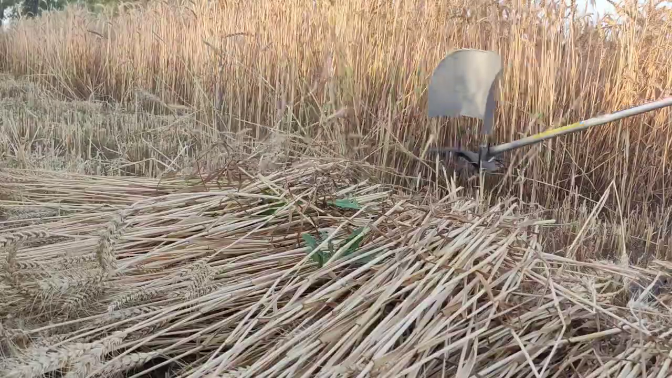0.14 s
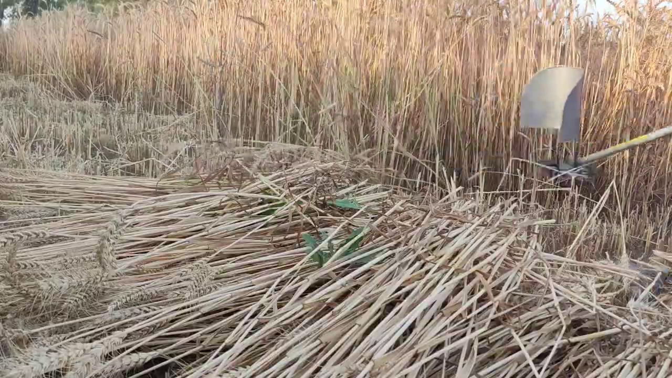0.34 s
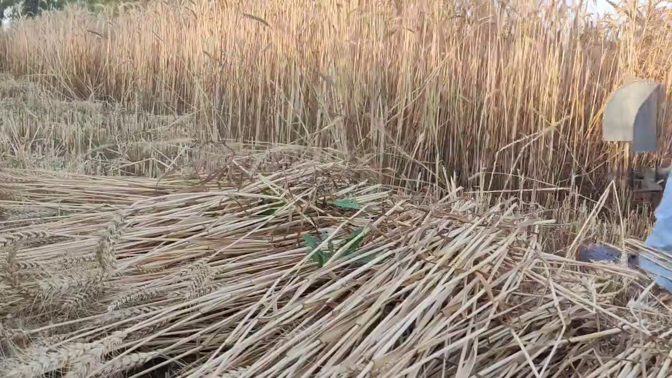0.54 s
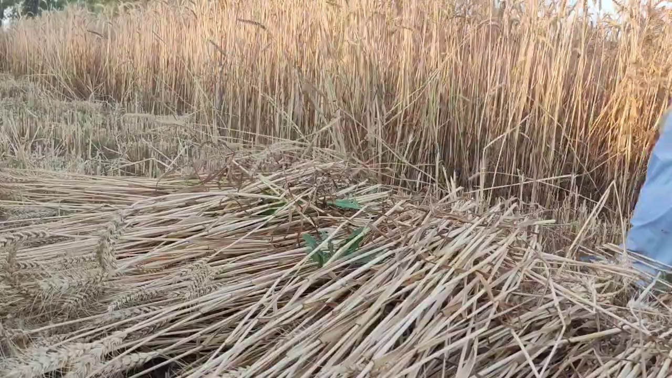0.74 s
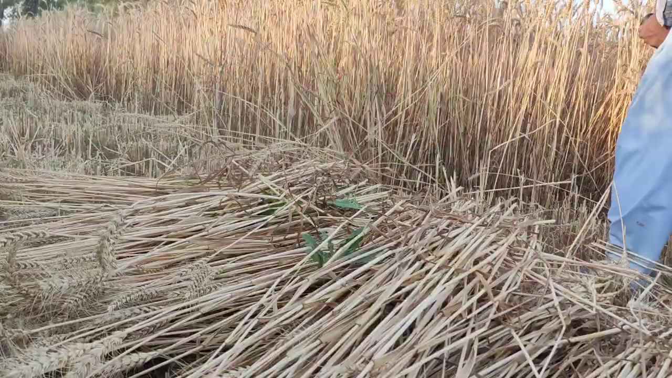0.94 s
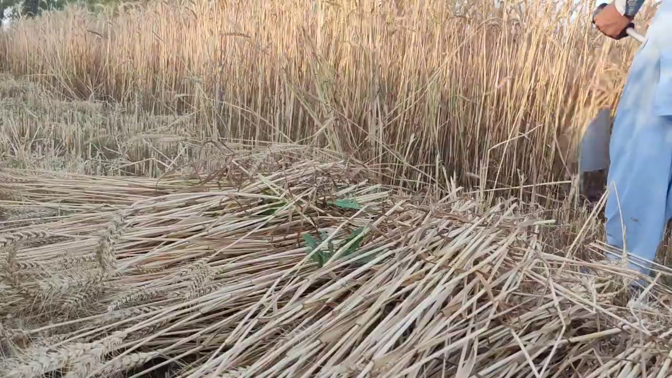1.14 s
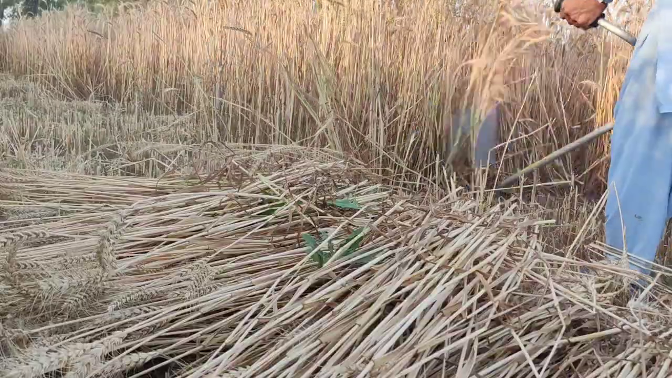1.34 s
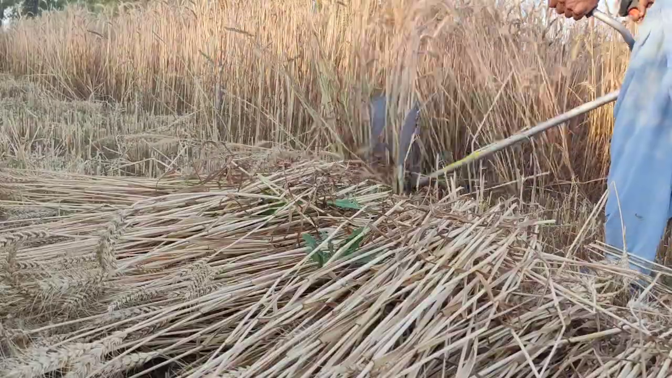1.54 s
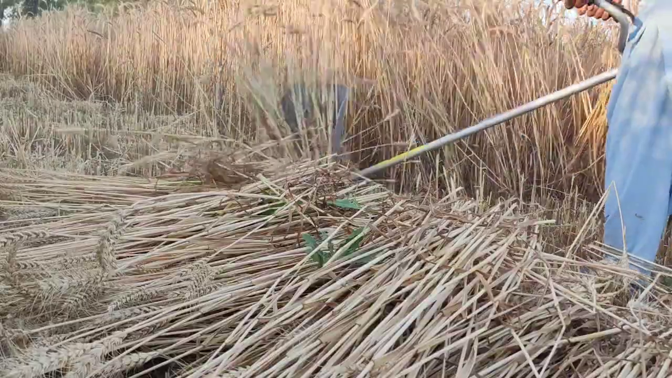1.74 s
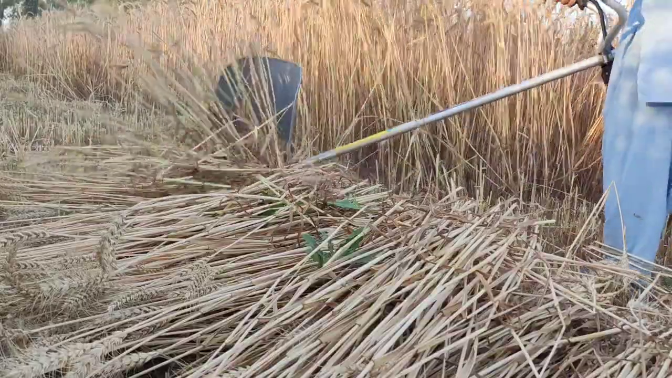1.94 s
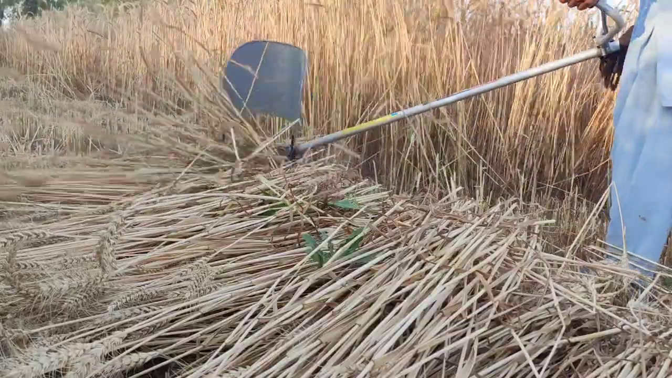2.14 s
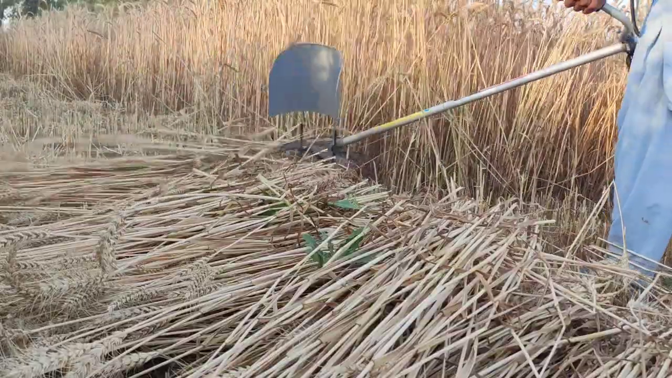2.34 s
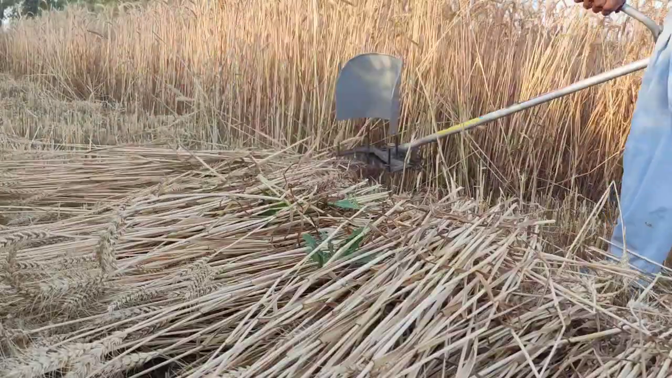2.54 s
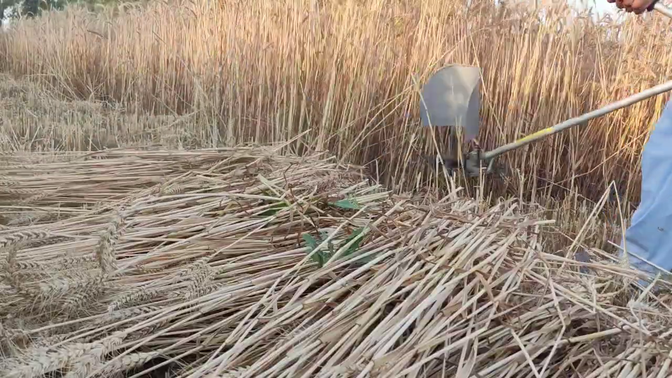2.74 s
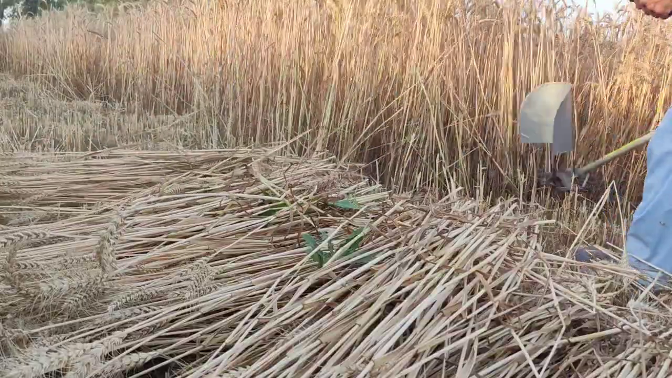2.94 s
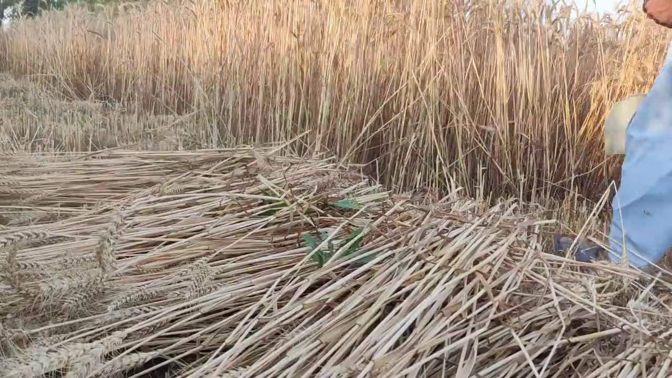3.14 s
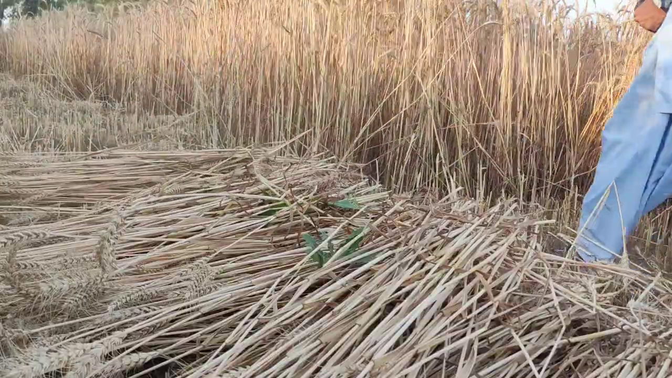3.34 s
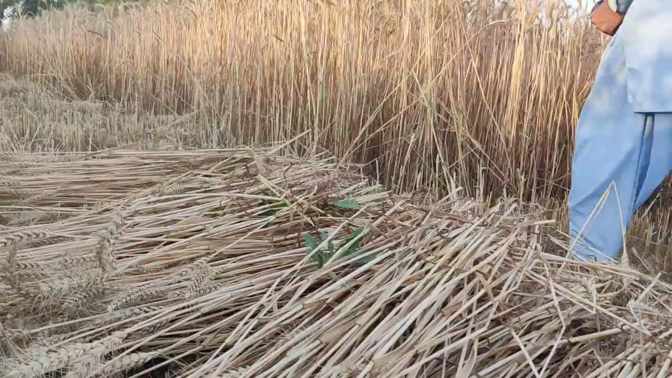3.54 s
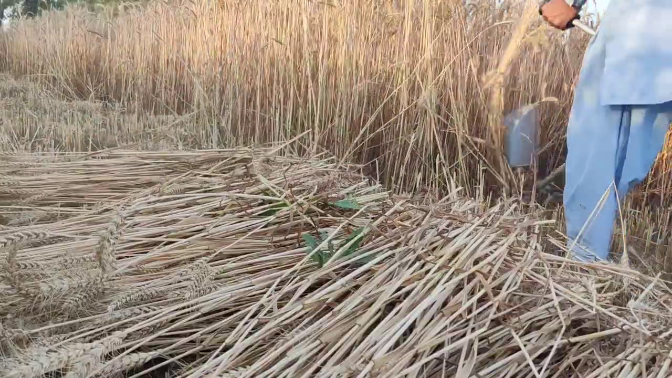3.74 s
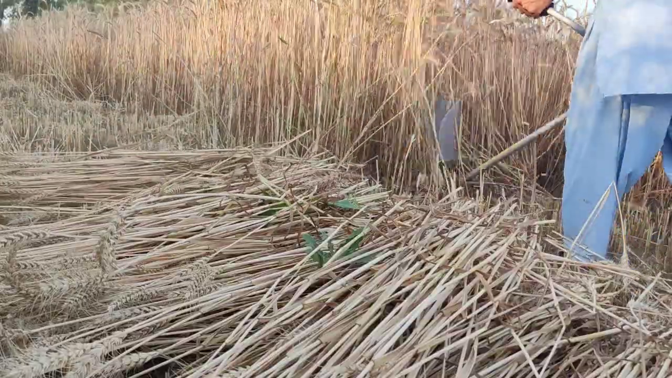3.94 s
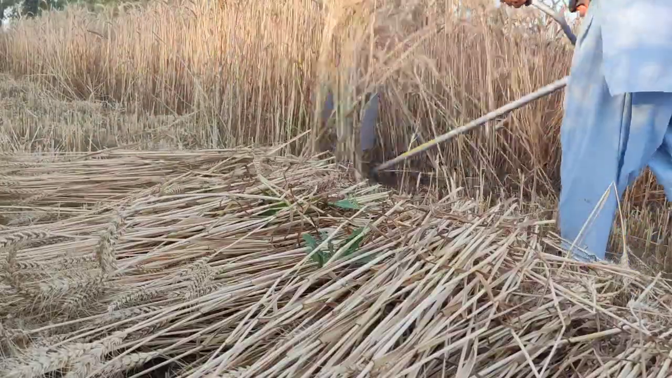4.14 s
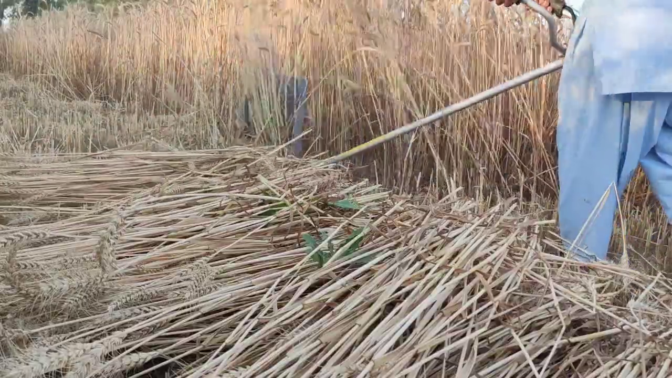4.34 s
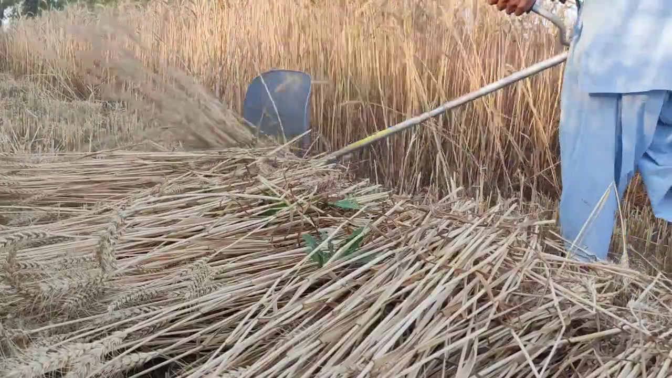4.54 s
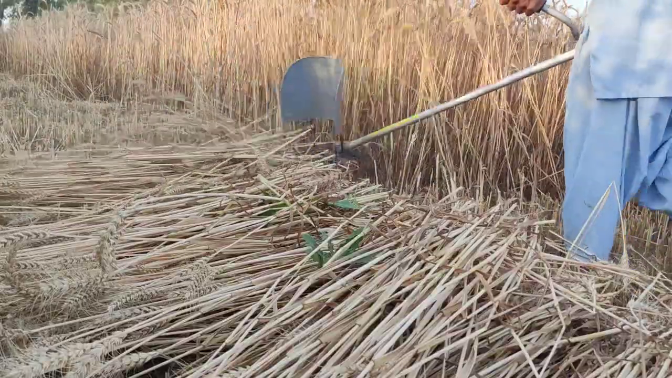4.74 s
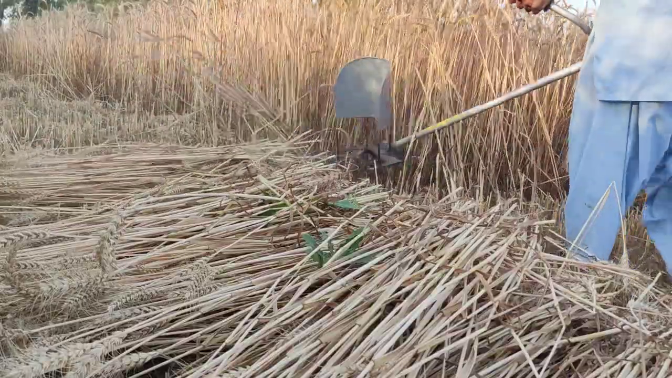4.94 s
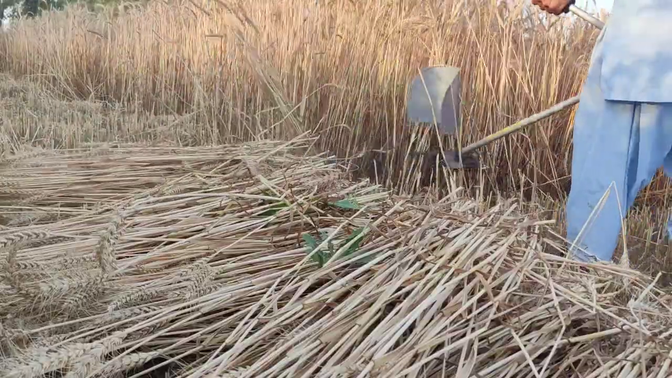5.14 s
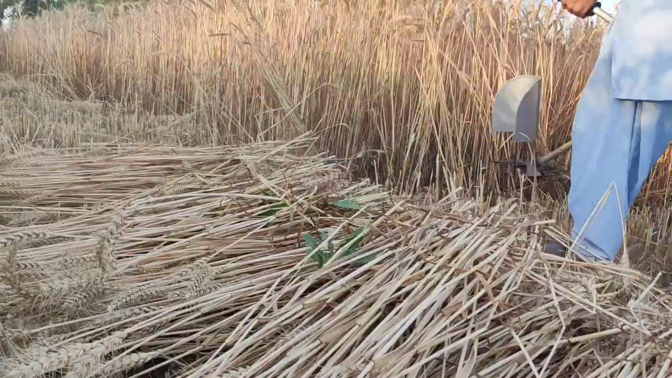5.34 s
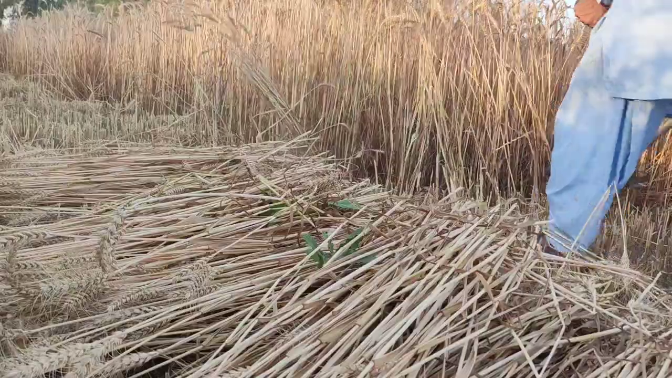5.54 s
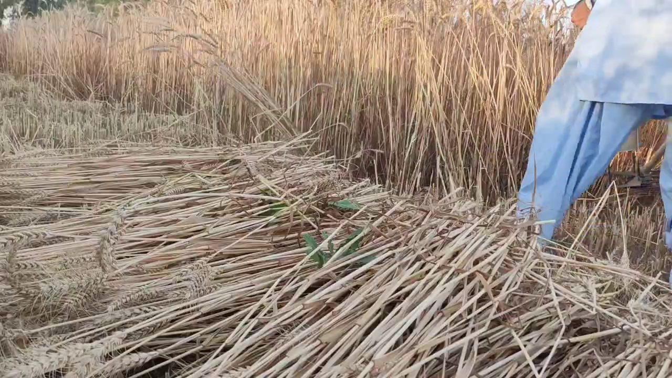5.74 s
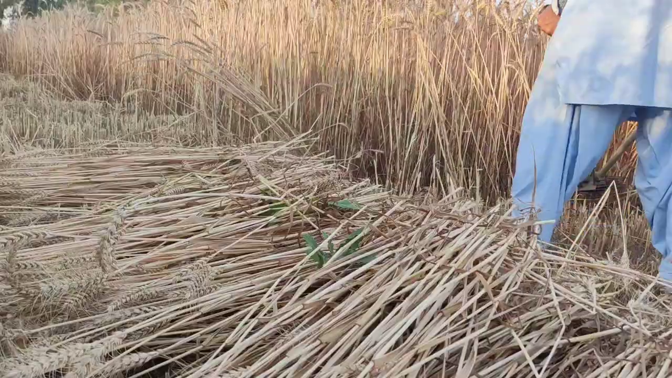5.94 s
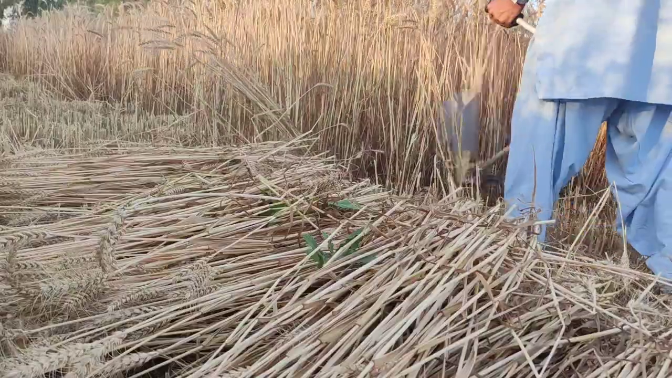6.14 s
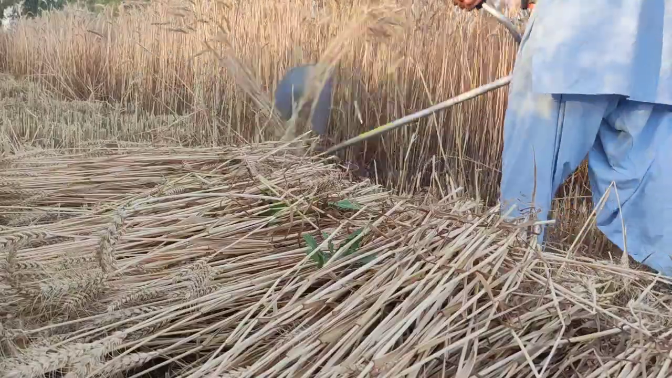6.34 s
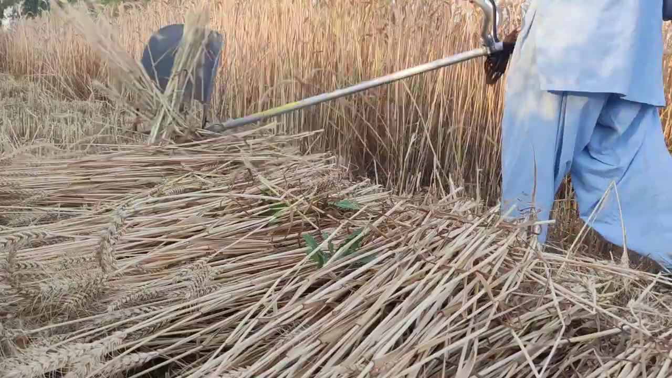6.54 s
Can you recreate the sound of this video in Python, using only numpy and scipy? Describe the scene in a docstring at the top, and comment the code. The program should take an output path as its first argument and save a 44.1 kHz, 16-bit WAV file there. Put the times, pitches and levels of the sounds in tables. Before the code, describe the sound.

Close four-stroke brush cutter engine rising and falling in three sweeps, metal disc scraping and singing through brittle stalks that crackle and snap.

```python
"""Brush cutter in standing wheat

A four-stroke petrol brush cutter is swung three times through dry wheat, close to a stereo microphone. Each
firing rings the air box and silencer with gas pulses and hisses in bursts of filtered noise. The throttle opens
before each sweep and closes after it, and the engine speed follows a drawn curve. In the crop the steel blade
rasps, rings and squeals and sings at its tooth rate; stalks snap and sharp firings crack."""
import sys
import numpy as np
from scipy import signal
from scipy.fft import rfft, irfft, next_fast_len
from scipy.io import wavfile
from scipy.ndimage import uniform_filter1d, map_coordinates

SR = 44100
rng = np.random.default_rng(int(sys.argv[2]) if len(sys.argv) > 2 else 0)


def master(y):
    """Save y as 16-bit WAV."""
    cut = np.clip(np.atleast_2d(y).T, -1, 1)
    pcm = np.round(cut * 32767)  # scale
    wavfile.write(sys.argv[1], SR, pcm.astype(np.int16))


N = 295470
IDLE_HZ, CLUTCH_HZ = 27.36, 30.14  # firings per second at idle and where the clutch grips


def amp(db):
    """Decibels to gain."""
    return 10 ** (np.asarray(db) / 20)


def unit(x):
    """Scale to rms 1."""
    return x / np.sqrt(np.mean(x ** 2) + 1e-20)


def along(points, hz):
    """Read (Hz, value) points on a log frequency axis."""
    f, v = np.transpose(points)
    return np.interp(np.log(hz + 1), np.log(f + 1), v)


def curves(rows):
    """One value per sample for each column after the time in seconds."""
    seconds, *columns = np.transpose(rows)
    return [np.interp(np.arange(N) / SR, seconds, column) for column in columns]


def gate(start, rise, end, fall):
    """Rise from 0 to 1, hold, and fall back; all in seconds."""
    return np.interp(np.arange(N) / SR, [start, start + rise, end, end + fall], [0, 1, 1, 0])


def swells(rows):
    """A dB curve of smooth humps, one per (centre s, half length s, dB) row."""
    t = np.arange(N) / SR
    return sum(db * np.exp(-((t - s) / half) ** 2) for s, half, db in rows)


def lagged(x, seconds):
    """Follow x with a first-order lag."""
    keep = np.exp(-1 / (seconds * SR))
    return signal.lfilter([1 - keep], [1, -keep], x)


def wobble(rate):
    """A smooth random curve with rate knots a second."""
    knots = rng.standard_normal(int(N * rate / SR) + 4)
    return map_coordinates(knots, [np.arange(N) * rate / SR])


def filtered(x, response):
    """Multiply the spectrum of x by a response of frequency."""
    size = next_fast_len(N + 8192)
    spectrum = rfft(x, size) * response(np.fft.rfftfreq(size, 1 / SR))
    return irfft(spectrum, size)[..., :N]


def ring(spectrum, size=8192):
    """The causal, minimum-phase impulse response of a body with this spectrum."""
    log_gain = np.log(amp(along(spectrum, np.fft.rfftfreq(size, 1 / SR))))
    cepstrum = irfft(log_gain)
    cepstrum[1:size // 2] *= 2
    cepstrum[size // 2 + 1:] = 0
    return irfft(np.exp(rfft(cepstrum)))


# Likeness of the two microphone ports. Each row: frequency in Hz, correlation (held within -1 to 1).
PORT_LIKENESS = [(100, 1.5), (1050, 3.5), (1200, 0.55), (2200, 0.95), (5000, -0.03), (14000, -0.1)]


def spread(pair, spectrum):
    """Colour two unrelated signals and blend them into a stereo pair of rms 1."""
    def mid_side(hz):
        turn = np.arccos(np.clip(along(PORT_LIKENESS, hz), -1, 1)) / 2
        return amp(along(spectrum, hz)) * np.array([np.cos(turn), np.sin(turn)])

    mid, side = filtered(pair, mid_side)
    return unit(np.array([mid + side, mid - side]))


def noise(patchy_db):
    """Two white noises with drifting patches of gain over time and frequency."""
    z = signal.stft(rng.standard_normal((2, N)), nperseg=1024)[2]
    field = rng.standard_normal(z.shape[1:])
    field = uniform_filter1d(field, size=4, axis=0)
    field = uniform_filter1d(field, size=12, axis=1)
    patchy = signal.istft(z * amp(patchy_db * unit(field)), nperseg=1024)[1]
    return unit(patchy[:, :N])


def level(law, throttle, speed):
    """The gain of a layer changes with throttle and engine speed."""
    idle_db, open_db, slope_db = law
    return amp(idle_db + open_db * throttle + slope_db * (speed - IDLE_HZ))


def placed(pair, late_ms, right_db):
    """Off to one side, a source reaches the left port later and the right port right_db stronger."""
    sides = np.array([[-.5], [.5]])
    return filtered(pair, lambda hz: amp(sides * right_db) * np.exp(2j * np.pi * hz * sides * late_ms / 10 ** 3))


def strokes(cycles, phase, scatter_db):
    """One impulse per engine cycle at the given phase, each of its own size."""
    at = np.interp(np.arange(int(cycles[-1]) + 1) + phase, cycles, np.arange(N)).astype(int)
    at = at[(at > 0) & (at < N - 1)]
    sizes = amp(scatter_db * rng.standard_normal(len(at)))
    return np.bincount(at, sizes, N)


def thump(cycles, spectrum, pattern):
    """The gas pulses of each cycle ring the air box and silencer."""
    pulses = sum(size * strokes(cycles, phase, scatter_db=1.94) for phase, size in pattern)
    return unit(signal.fftconvolve(pulses, ring(spectrum))[:N])


# Colour of one gas pulse, throttle open and closed. Each row: frequency in Hz, relative level in dB.
OPEN_PULSE = [(20, -43), (40, -2.5), (78, 1.5), (125, -1), (200, -2.5), (245, -5), (330, -16), (440, -8),
              (570, -1.5), (690, -5.5), (850, -28), (1300, -8), (2000, -43.5)]
CLOSED_PULSE = [(20, -7), (55, 2.5), (110, 4.5), (165, 4), (220, 4.5), (270, 1.5), (360, -11.5),
                (500, -10.5), (660, 4.5), (760, -3), (900, -10.5), (1300, -11), (2000, -61)]
# Gas pulses of one cycle, throttle open and closed. Each row: phase in cycles, signed relative size.
PULLING = [(0.286, 0.78), (0.586, -0.67)]
COASTING = [(.372, -0.98), (.605, -0.49)]


def engine(cycles, throttle):
    """Open throttle gives a push and a pull; closed throttle lighter puffs."""
    pulling = np.sqrt(throttle) * thump(cycles, OPEN_PULSE, PULLING)
    coasting = np.sqrt(1 - throttle) * thump(cycles, CLOSED_PULSE, COASTING)
    return pulling + amp(-1.06) * coasting


def chuff(cycles, throttle, opens, rise, fall, steady):
    """Envelope of a burst that returns each cycle, stronger under load; times in cycles."""
    age = (cycles - opens) % 1
    burst = unit((1 - np.exp(-age / rise)) ** 2 * np.exp(-age / fall))
    strength = (0.24 + 0.57 * throttle) * amp(1.55 * wobble(35))
    envelope = np.hypot(steady, strength * burst)
    # hold the slow loudness even, so that only the pulsing is left
    return envelope / np.sqrt(uniform_filter1d(envelope ** 2, size=6000))


# Colour of the steel disc, lent to the gear housing too. Each row: frequency in Hz, relative level in dB.
STEEL_COLOUR = [(1500, 2), (2400, 8), (4000, -11), (5700, -1.5), (6900, -0.5), (8200, 13), (10000, -8.5),
                (15000, 0)]


def gear_rattle(cycles, speed, hz, width_hz):
    """Near idle the slack drive is jolted once a cycle and rings the gear housing."""
    slack = np.clip((32 - speed) / 4, 0, 1)
    pulsing = chuff(cycles, slack, opens=0.37, rise=0.086, fall=0.31, steady=0.54)
    jolts = pulsing * noise(patchy_db=0.5)
    housing = filtered(jolts, lambda f: (1j * f * width_hz / (hz * hz - f * f + 1j * f * width_hz)) ** 2)
    return slack * spread(housing, STEEL_COLOUR)


# Colours of valve gear and exhaust gas, hiss, finest fizz (gas and straw) and low turbulence.
# Each row: frequency in Hz, relative level in dB.
VALVE_COLOUR = [(1500, -12), (3000, -9.5), (4200, -5.5), (5500, -3.5), (6300, 4), (6950, 6), (7500, -1),
                (8100, 3.5), (8600, -19), (10000, -9.5), (15000, -71)]
HISS_COLOUR = [(500, -3), (750, 1.5), (950, 3), (1290, 5.5), (1500, 5), (1750, 3.5), (2300, 4), (2950, 4),
               (4100, -2), (5500, 1.5), (7000, -3), (8100, 0), (8800, -10), (13000, -48)]
FIZZ_COLOUR = [(6500, -26), (8500, 8), (9400, 2.5), (10300, 1.5), (11400, 4.5), (12400, 1), (14000, 0),
               (15500, -4)]
RUMBLE_COLOUR = [(20, -2), (60, 4), (150, -14), (350, -13), (600, 10.5), (1200, -16.5), (2000, -35)]
# Level laws, before the other gains of each layer.
# Each row: level in dB at idle, dB added by open throttle, dB per extra firing a second.
THUMP_LAW = (-26.5, 2.6, 0.25)
CLATTER_LAW = (-31, 5.7, 0.13)
GAS_FIZZ_LAW = (-45, 9.2, 0.39)
# The throttle is squeezed before each sweep.
# Each row: start of opening in seconds, opening time in seconds, start of closing in seconds.
SQUEEZES = [(0.57, 0.44, 1.975), (3.049, 0.095, 4.58), (5.55, 0.1, 6.8)]
CLOSING_S, LULL_S, LULL_DB = 0.08, 0.074, -0.5  # the thump falters as the throttle shuts
BARK_S, BARK_DB = 0.06, 2  # the first firings on a freshly opened throttle crack harder
THUMP_SINKS_DB = -4.5  # while the blade is deep in the crop


def motor(speed, throttle, bite, deep):
    """Thump, valve tick, exhaust hiss and gear rattle, all locked to the firings."""
    cycles = np.cumsum(speed) / SR
    # out of the crop the engine makes most of the treble
    free = np.sqrt(1 - .9 * bite)
    tick = free * chuff(cycles, throttle, opens=.12, rise=0.018, fall=0.31, steady=0.22)
    gas = free * chuff(cycles, throttle, opens=0.27, rise=0.038, fall=0.77, steady=0.63)
    valves = amp(-0.5) * tick * spread(noise(patchy_db=1.0), VALVE_COLOUR)
    hiss = amp(1.0) * gas * spread(noise(patchy_db=2.5), HISS_COLOUR)
    rattle = amp(-3) * free * gear_rattle(cycles, speed, hz=1696, width_hz=150)
    fizz = level(GAS_FIZZ_LAW, throttle, speed) * gas * spread(noise(patchy_db=6), FIZZ_COLOUR)
    # turbulence rides on the gas pulses and grows with throttle and with the blade's draught
    gust = chuff(cycles, throttle, opens=0.34, rise=0.037, fall=1.0, steady=1.0)
    turbulence = amp(-15.5 + 0.8 * throttle + 4 * bite) * gust
    rumble = turbulence * spread(noise(patchy_db=1.5), RUMBLE_COLOUR)
    lulls_db = swells([(closes + CLOSING_S, LULL_S, LULL_DB) for _, _, closes in SQUEEZES])
    body = level(THUMP_LAW, throttle, speed) * (engine(cycles, throttle) + rumble)
    body = amp(THUMP_SINKS_DB * deep + lulls_db) * body
    bark = amp(swells([(opens + rise, BARK_S, BARK_DB) for opens, rise, _ in SQUEEZES]))
    clatter = level(CLATTER_LAW, throttle, speed) * (bark * valves + hiss + rattle)
    return body + clatter + bark * fizz


def crackle(rate, spread_db, life):
    """Envelope of rate small stalk fractures a second, of very unequal size, each dying over life seconds."""
    sizes = amp(spread_db * np.minimum(rng.exponential(size=N), 4))
    hits = (rng.random(N) < rate / SR) * sizes
    return unit(signal.lfilter([1], [1, -np.exp(-1 / (life * SR))], hits))


# Colour of a crack. Each row: frequency in Hz, gain in dB.
CRACK_COLOUR = [(500, -33), (2500, -39), (7000, 21.5), (15000, -1)]
# Loud short cracks near the microphone, some from snapping stalks, some from sharp engine firings. Each row:
# start in seconds, relative level in dB.
CRACKS = [(1.252, 1.5), (3.1214, -10), (3.5984, -4.5), (3.7286, -9), (3.866, -2), (5.1548, -13),
          (5.6664, -14), (5.761, -7), (6.304, -3), (6.4837, -1)]


def cracks(t60):
    """Short bright cracks, each falling 60 dB in t60 seconds."""
    out = np.zeros((2, N + SR))
    t = np.arange(SR // 20) / SR
    for s, db in CRACKS:
        crack = amp(db - 18 - 60 * t / t60) * rng.standard_normal((2, len(t)))
        out[:, round(s * SR):][:, :len(t)] += crack
    return filtered(out[:, :N], lambda hz: amp(along(CRACK_COLOUR, hz)))


# Free modes of the steel disc. Each row: frequency in Hz, width in Hz, relative level in dB.
DISC_MODES = [(1380, 150, 2.5), (1753, 37, -10), (2386, 40, 1), (3120, 380, 6), (4030, 34, 3.5),
              (4520, 37, -0.5), (4750, 59, -4), (5890, 280, 6), (6470, 39, 6), (7350, 81, -24),
              (7630, 110, 18), (7500, 87, -12), (8070, 71, 12), (8550, 64, -32), (9400, 100, 13)]


def disc(drive):
    """Stalks scrape the steel disc and keep its modes ringing."""
    def modes(f):
        return sum(amp(db) * 1j * f * w / (c * c - f * f + 1j * f * w) for c, w, db in DISC_MODES)

    return unit(filtered(drive, modes))


# The disc is caught and squeals loudly.
# Each row: start in seconds, length in seconds, frequency in Hz, relative level in dB.
SQUEALS = [(1.23, 0.22, 8200, -24.5), (1.24, 0.26, 5780, -28), (1.311, 0.3, 6680, -19.5),
           (1.58, 0.26, 6950, -20), (2.121, 0.64, 3100, -35.5), (2.201, 0.25, 7730, -27.5),
           (3.8, 0.354, 7350, -20.5), (4.102, 0.43, 2416, -28), (4.12, 0.3, 7050, -20),
           (4.2, 0.2, 4650, -27), (4.619, 0.49, 4380, -36.5), (4.728, 0.34, 8200, -34),
           (4.8, 0.42, 5850, -36.5), (6.35, 0.28, 7443, -23)]


def squeals(sag, flutter_db, flutter_rate):
    """Each squeal swells and fades, wavers, and sags a little in pitch as the disc slows."""
    out = np.zeros((2, N + SR))
    for s, length, hz, db in SQUEALS:
        t = np.arange(int(np.clip(length, .05, .9) * SR)) / SR
        swell = np.sin(np.pi * (t / t[-1]) ** 0.76).clip(0) ** 0.69
        turn = 2 * np.pi * hz * (t + sag * t * (t[-1] - t) / 2)
        for port in out:
            knots = rng.standard_normal((2, 128))
            gain, drift = (map_coordinates(row, [t * flutter_rate], mode="mirror") for row in knots)
            loudness = amp(db + 4.5 + flutter_db * gain) * swell
            port[round(s * SR):][:len(t)] += loudness * np.sin(turn + 1.2 * drift)
    return out[:, :N]


DRAG, DRAG_S = 0.13, 0.22  # share of blade speed lost to the crop with the clutch open, and its lag


def tooth_rate(speed, bite, strikes):
    """The blade follows the engine; near idle the clutch lets go and the crop brakes it."""
    loose = np.clip((CLUTCH_HZ - speed) / 2, 0, 1)
    return speed * strikes * (1 - DRAG * lagged(bite * loose, DRAG_S))


# Overtones of the blade's song. Each row: multiple of the tooth rate, relative level in dB.
TOOTH_ORDERS = [(1, -4), (2, 10.5), (3, 4), (4, -8), (5, -7.5), (6, -24), (7, -20), (8, -21)]


def teeth(tooth_hz, bite, wander, blur, blur_rate):
    """The spinning blade sings at its tooth rate; teeth that strike stalks add fuzzy overtones."""
    turn = 2 * np.pi * np.cumsum(tooth_hz * (1 + wander * wobble(45))) / SR
    pair = np.zeros((2, N))
    for k, db in TOOTH_ORDERS:
        strength = amp(db) * (bite if k > 1 else 1) * amp(1.5 * wobble(25))
        for port in pair:
            drift = np.exp(2j * wobble(30))
            fuzz = drift + blur * np.sqrt(k) * (wobble(blur_rate) + 1j * wobble(blur_rate))
            port += strength * np.real(fuzz * np.exp(1j * k * turn))
    return spread(pair, STEEL_COLOUR)


# The blade passes through the crop. Each row: entry in seconds, entry time in seconds,
# start of leaving in seconds, leaving time in seconds, tooth strikes per firing,
# extra straw level in dB, extra song level in dB.
CUTS = [(1.12, 0.2, 2.2, 0.26, 58.8, 1.5, 1), (3.83, 0.04, 4.85, 0.15, 60.4, -0.5, -1.5),
        (6.13, 0.16, 6.8, 0.2, 60.3, -1.5, 1.5)]


def per_cut():
    """Tooth strikes, straw dB and song dB of each cut, gliding from one cut to the next."""
    return curves([(s, *values) for enters, _, leaves, _, *values in CUTS for s in (enters, leaves)])


# Colour of the rasp. Each row: frequency in Hz, relative level in dB.
RASP_COLOUR = [(410, -20), (700, -8), (855, -13), (1280, -8), (1540, -11.5), (1700, -6), (2200, -6),
               (2350, -7), (2720, -7), (3110, -6), (4250, -7), (4590, -4), (5360, -8), (6930, 2.5),
               (10000, -20), (13000, -48), (22000, -120)]
# Thick bunches of stalks meet the blade. Each row: centre in seconds, half length in seconds, extra dB.
BUNCHES = [(1.37, 0.075, 7), (1.8, 0.09, 4), (1.99, 0.12, 4.5), (3.92, 0.13, 3), (4.25, 0.092, 3),
           (4.85, 0.028, -1.5), (6.42, 0.12, 3.5), (6.6, 0.084, 4)]
# Level laws, before the other gains of each layer; the song rides on the rasp law as well.
# Each row: level in dB at idle, dB added by open throttle, dB per extra firing a second.
RASP_LAW = (-22.5, 0.98, 0.092)
STRAW_LAW = (-32.5, 5.4, 0.3)
SONG_LAW = (-5.5, -0.092, -0.48)
# the teeth start to sing well into the cut; faint in free air
SONG_AFTER_S, SONG_RISE_S, SONG_FREE_DB = 0.25, 0.25, -20
SETTLE_S, SETTLE_DB = 0.2, -13  # cut straw still rustles after the blade has left


def blade(speed, throttle, bite):
    """The blade rasps, rings and sings in the crop, most often louder in bunches; torn straw fizzes."""
    strikes, straw_db, song_db = per_cut()
    bunch_db = swells(BUNCHES)
    cutting = np.sqrt(bite) * unit(2.2 + crackle(rate=480, spread_db=3.5, life=0.0025))
    rasp = amp(-0.5) * cutting * spread(noise(patchy_db=5.0), RASP_COLOUR)
    scrape = noise(patchy_db=2.5)
    ringing = amp(-5.0) * np.sqrt(bite + 0.005) * disc(scrape)

    singing = sum(gate(enters + SONG_AFTER_S, SONG_RISE_S, leaves, fall)
                  for enters, _, leaves, fall, *_ in CUTS)
    song_gain = level(SONG_LAW, throttle, speed) * amp(song_db) * singing + amp(SONG_FREE_DB)
    tooth_hz = tooth_rate(speed, bite, strikes)
    song = song_gain * teeth(tooth_hz, bite, wander=0.004, blur=0.47, blur_rate=240)
    steel = level(RASP_LAW, throttle, speed) * amp(bunch_db) * (rasp + ringing + song)

    straw = amp(2 * wobble(22)) * unit(6 + crackle(rate=220, spread_db=6.5, life=.0008))
    settling = amp(SETTLE_DB) * np.sqrt(lagged(bite, SETTLE_S))
    falling = np.hypot(np.sqrt(bite) * cutting, settling)
    spray = spread(noise(patchy_db=2.5), FIZZ_COLOUR)
    straw_gain = level(STRAW_LAW, throttle, speed) * amp(straw_db + 0.64 * bunch_db)
    fizz = straw_gain * falling * straw * spray
    squeal = squeals(sag=0.0153, flutter_db=2.5, flutter_rate=60)
    return steel + fizz + squeal + cracks(t60=0.025)


# Engine speed. Each row: time in seconds, firings per second.
ENGINE_SPEED = [(0.0, 29.84), (0.4, 27.46), (0.609, 27.46), (0.715, 29.27), (1.377, 38.23), (1.717, 38.8),
                (1.882, 34.51), (1.995, 33.65), (2.209, 27.31), (3.017, 27.67), (3.161, 31.65),
                (3.373, 32.81), (3.852, 41.38), (4.591, 38.3), (4.801, 33.61), (5.147, 30.13),
                (5.572, 27.58), (5.661, 30.84), (6.276, 40.73), (6.7, 40.88)]
# The whole sound dips briefly. Each row: centre in seconds, half length in seconds, change in dB.
DIP = [(4.06, 0.049, -9)]
DEEP_AFTER_S, DEEP_RISE_S = 0.1, 0.22  # the blade is deep in the crop a little after it enters
SWING_DB, SWING_S = 3, 0.54  # the blade swings toward the left port as it cuts: left-right dB, lag


def scene():
    """The engine stays on the right with the reaper; the blade swings toward the left port in each cut."""
    speed, = curves(ENGINE_SPEED)
    throttle = sum(gate(opens, rise, closes, CLOSING_S) for opens, rise, closes in SQUEEZES)
    bite = sum(gate(enters, rise, leaves, fall) for enters, rise, leaves, fall, *_ in CUTS)
    deep = sum(gate(enters + DEEP_AFTER_S, DEEP_RISE_S, leaves, fall)
               for enters, _, leaves, fall, *_ in CUTS)
    machine = placed(motor(speed, throttle, bite, deep), late_ms=0.351, right_db=0.17)
    swing = amp(np.array([[.5], [-.5]]) * SWING_DB * lagged(deep, SWING_S))
    cutter = swing * placed(blade(speed, throttle, bite), late_ms=0.089, right_db=-1.5)
    return amp(swells(DIP)) * (machine + cutter)


# Colour difference of the two microphone ports. Each row: frequency in Hz, left minus right in dB.
PORT_TILT = [(60, -2), (92, 0.5), (140, 2), (210, -2), (330, 1), (500, -2.5), (770, 1.5), (1170, -1),
             (1790, -1.5), (2740, -3), (4190, -7.5), (6410, -6.5), (9810, 5), (15000, -15.5)]
TOP_HZ = 15550  # nothing passes above this


def record(dry):
    """Each microphone port has its own colour; the highest peaks are rounded off and the band is limited."""
    pair = filtered(dry, lambda hz: amp(np.array([[.5], [-.5]]) * along(PORT_TILT, hz)))
    pair = pair / (1 + np.abs(pair / .95) ** 6) ** (1 / 6)
    return filtered(pair, lambda hz: hz < TOP_HZ)


dry = scene()
out = record(dry)
master(out)
```